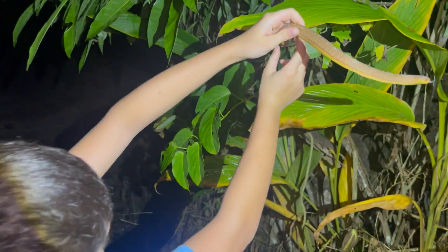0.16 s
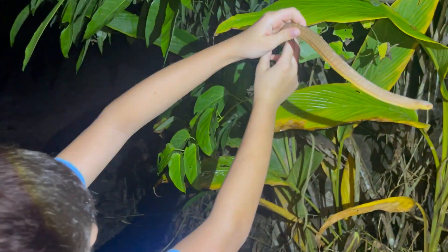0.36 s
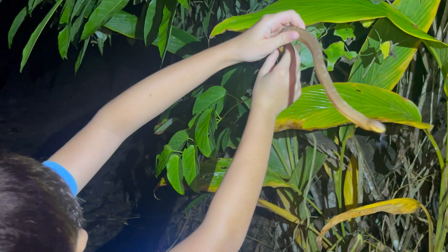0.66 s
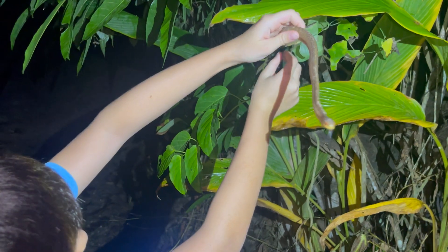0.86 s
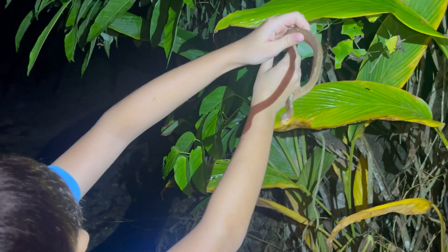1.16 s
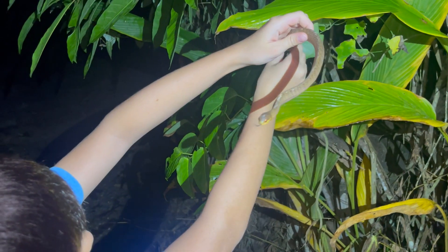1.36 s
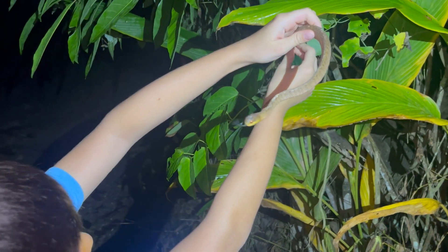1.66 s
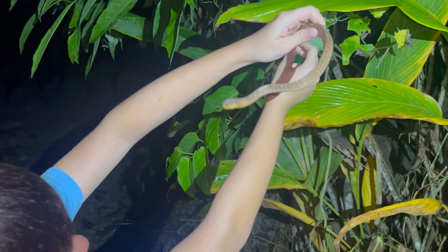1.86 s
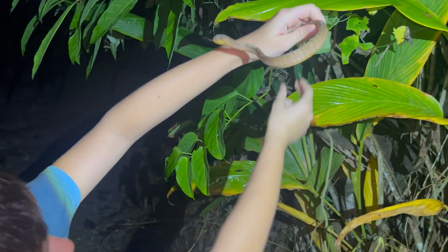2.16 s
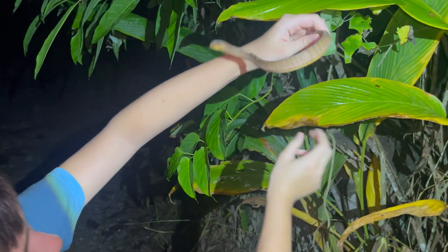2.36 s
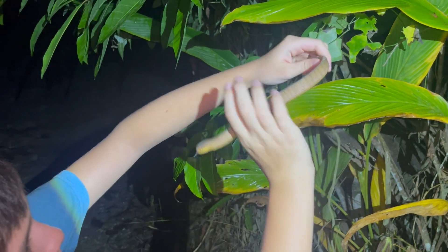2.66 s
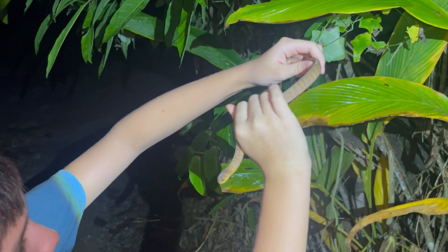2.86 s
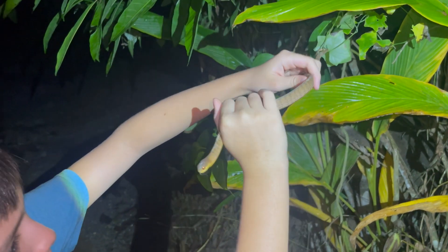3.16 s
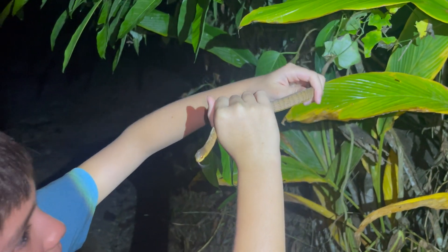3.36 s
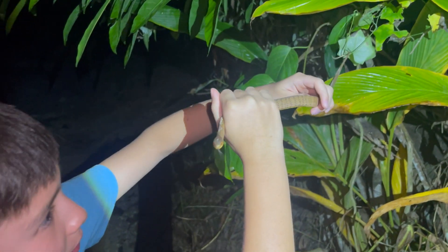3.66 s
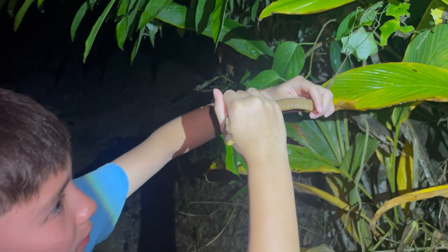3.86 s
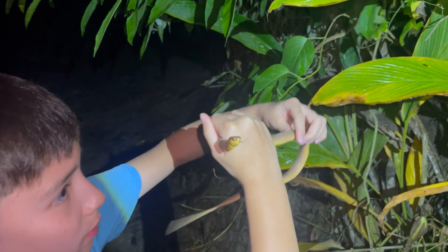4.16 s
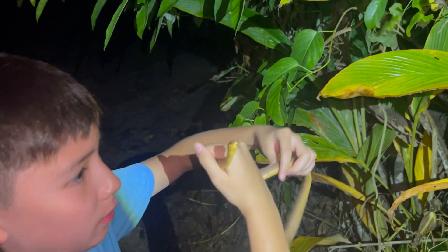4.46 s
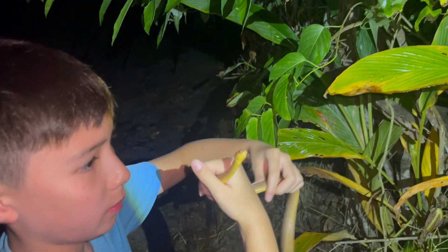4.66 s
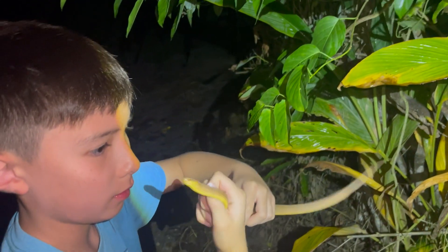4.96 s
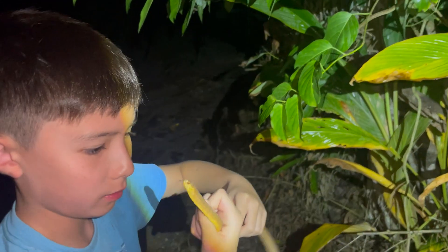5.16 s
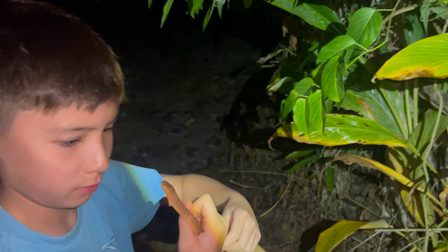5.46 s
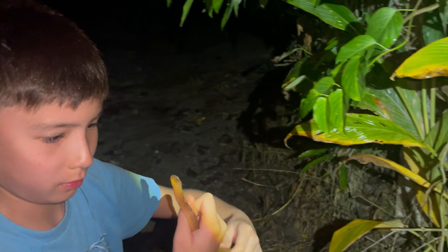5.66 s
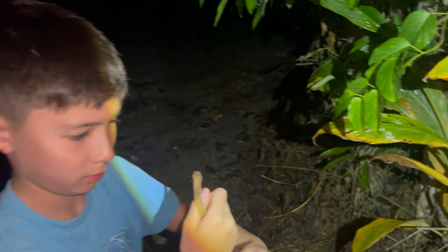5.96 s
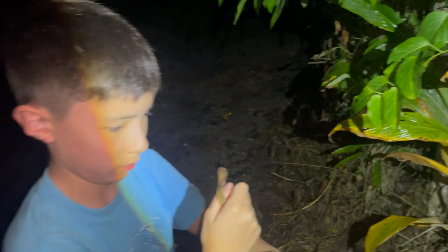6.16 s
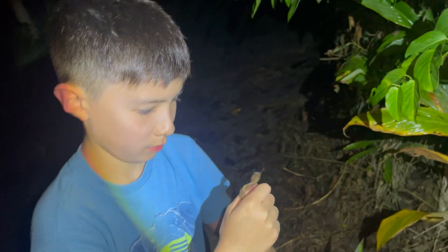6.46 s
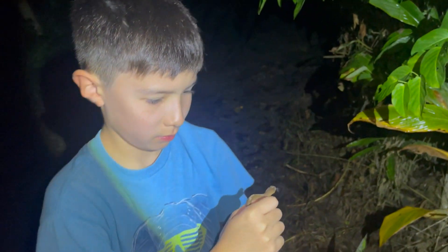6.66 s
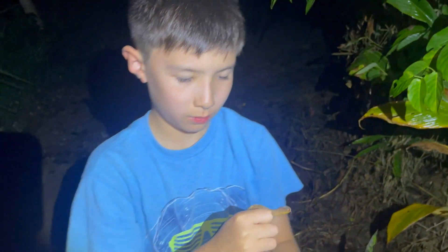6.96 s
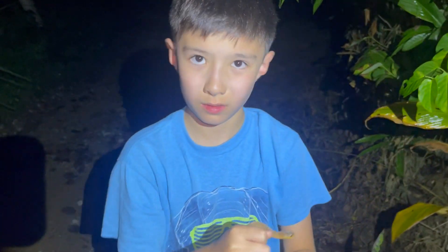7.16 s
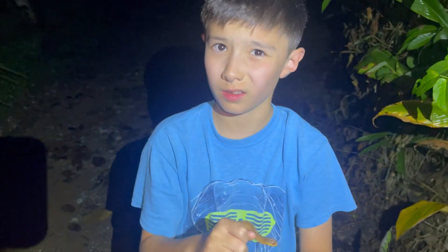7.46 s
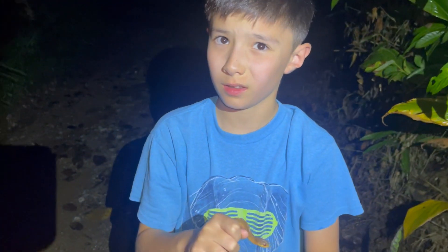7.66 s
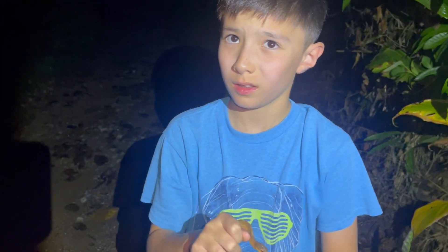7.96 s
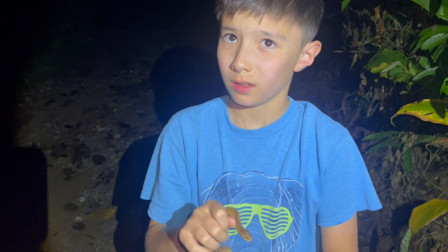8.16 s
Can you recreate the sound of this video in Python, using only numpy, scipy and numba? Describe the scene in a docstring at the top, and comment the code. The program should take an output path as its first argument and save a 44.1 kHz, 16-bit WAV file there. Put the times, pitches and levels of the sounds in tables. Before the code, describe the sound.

Crickets trill without a break for the whole eight seconds or so, a high, fast-pulsing chorus on all sides of a rainforest at night. Three other crickets chirp through the leaves, slightly lower, in short rising strokes, each about twice a second. Far insects and frogs blur into a faint throb over a light hiss. The sound drifts gently between left and right as the hand-held phone turns. From about 1 to 5 seconds there are only very soft cloth movements and dull handling thuds, with a few tiny stem ticks around 2 seconds. From 5.5 seconds, leaves and cloth rub close to the microphone in short bursts, mixed with small dry snaps. Near 6.9 seconds comes a quick cluster of hollow knocks with one sharp hit, the loudest moment. Light rustles, clicks and faint thuds continue, with a crisp snap at 8.2 seconds.

```python
"""Crickets in a wet forest at night

Taken among the trees on a hand-held phone, its two microphones slowly turning. Crickets trill on all
sides with steady wing strokes, and three others chirp in rising strokes through the leaves. Far insects
and frogs blur into bands over a faint hiss. Close to the phone, leaves and cloth rub, stems snap, feet
and grip thud and something hollow is knocked, mostly in the last three seconds."""
import sys
import numpy as np
from scipy import signal
from scipy.fft import rfft, irfft
from scipy.io import wavfile
from scipy.ndimage import uniform_filter1d
from numba import njit

SR = 44100
rng = np.random.default_rng(int(sys.argv[2]) if len(sys.argv) > 2 else 0)


def file_out(sig):
    """Save sig as 16-bit WAV at sys.argv[1]."""
    # one column per channel
    cols = np.atleast_2d(sig).T
    # limit, then scale
    lim = np.clip(cols, -1, 1)
    pcm = np.round(lim * 32767).astype(np.int16)
    wavfile.write(sys.argv[1], SR, pcm)


N = 366030
T = np.arange(N) / SR

# trilling crickets all round, the two nearest first (their pitch comes from NEAR_WANDER):
# stroke rate/Hz, wing f/Hz, relative level/dB, stroke length/s, pitch fall/Hz, alternate stroke cut/dB
TRILLING_CRICKETS = [ (61.17, 5500, 0, .016, 120, 1.5), (60.19, 5600, -1.5, .0165, 60, 0),
                     (60.19, 5700, -4, .008, 300, 1), (61.04, 5400, -1, .014, 480, -3),
                     (62.15, 5540, -3.5, .014, 410, -5), (58.76, 5300, -3.5, .014, 1070, -3.5),
                     (63.8, 5680, -8, .011, 610, 6), (60.4, 5070, -12, .008, 240, 5),
                     (63.6, 5910, -8.5, .010, 730, 4)]
# unsteadiness of each one's stroke rate: spread/share of the rate
RATE_SPREAD = [.001, .00015, .00015, .002, .003, .004, .004, .002, .004]
# the two nearest wander: t/s, f of the first/Hz, f of the second/Hz, gain of the second/dB
NEAR_WANDER = [(0, 5450, 5680, -8), (.5, 5480, 5650, -9), (.9, 5534, 5630, -8), (1, 5540, 5620, -2.5),
               (2, 5534, 5580, -1.5), (3.05, 5535, 5583, -1), (3.2, 5550, 5598, -12),
               (3.5, 5460, 5640, -11), (3.6, 5446, 5460, -12), (4.8, 5430, 5550, -14), (5, 5440, 5670, -18),
               (5.6, 5436, 5598, -8), (6.1, 5373, 5560, -20), (6.5, 5525, 5560, -16), (7, 5570, 5598, -15),
               (7.5, 5466, 5610, -8), (8.3, 5586, 5526, 3)]
# the whole trill at the turning phone: t/s, level/dB, left minus right/dB
TRILL_AT_PHONE = [(0, -39.5, 0), (.3, -37.5, 0), (1, -39.5, -2), (1.7, -39, -1.5), (2.4, -40, -0.5),
                  (3, -39, -1), (3.7, -40.5, 1.5), (4.4, -39, 0.5), (5.2, -39.5, -1.5), (5.6, -38, 0.5),
                  (6, -38.5, -0.5), (6.4, -40, 0), (7, -39, -1.5), (7.4, -40.5, 1), (8.3, -39.5, 0)]
NEAR_DIRECT_DB, TRILL_SIDE_DB = [-6.5, -1.5], -0.5  # direct sound of the nearest two; side against mid
FLUTTER_HZ, FLUTTER_DB = 36, 1.5  # quick chance swells of the trill

# chirping crickets by name: stroke spacing/s, full f/Hz, first stroke flat by/Hz,
# flatness left at each next stroke/share, full climb/Hz, first stroke cut/dB, left minus right/dB
CHIRPING_CRICKETS = {"low": (.061, 4660, 240, .4, 470, 1.5, 1.5),
                     "middle": (.062, 4660, 60, .45, 170, 1.5, -1.5),
                     "high": (.066, 4915, 130, .3, 200, 3, -2.5)}
# their chirps: t/s, singer, length/s, level/dB, growth per stroke/dB
CHIRP_TIMES = [(-0.106, "high", .2, -43, 0), (-0.124, "middle", .19, -47.5, 0.5),
               (0.282, "low", .19, -44.5, 2), (0.35, "high", .2, -41, -3), (0.442, "middle", .12, -52, 5.5),
               (0.778, "low", .19, -47.5, 2.5), (0.891, "high", .2, -46.5, 0.5),
               (0.963, "middle", .19, -48.5, 1.5), (1.308, "low", .19, -47, 2.5),
               (1.428, "high", .2, -45, 0.5), (1.602, "middle", .12, -49, -1),
               (1.861, "low", .25, -44.5, 1), (1.884, "high", .2, -48, 4), (2.325, "high", .26, -46, 1),
               (2.417, "low", .19, -43, 0), (2.812, "middle", .12, -51, -2), (2.931, "low", .19, -46, 2.5),
               (2.932, "middle", .12, -49, 7), (3.308, "high", .26, -47, 3.5),
               (3.404, "low", .19, -42, -0.5), (3.644, "middle", .06, -48, 0),
               (3.763, "high", .2, -42.5, 0), (3.795, "middle", .12, -50, 3), (3.889, "low", .19, -47, 4.5),
               (4.256, "middle", .06, -47, 0), (4.326, "high", .2, -42, -0.5),
               (4.369, "low", .19, -44.5, 3.5), (4.815, "low", .19, -44, 1.5),
               (4.857, "high", .26, -43.5, 0.5), (5.368, "low", .19, -43, 2.5),
               (5.393, "high", .26, -44.5, 1), (5.859, "low", .19, -42, 3), (5.933, "high", .2, -40.5, 0.5),
               (6.066, "middle", .12, -52, 6), (6.373, "low", .25, -40, 1.5),
               (6.531, "high", .2, -39.5, -3), (6.622, "middle", .19, -43.5, -0.5),
               (7.04, "low", .19, -41, 0), (7.088, "high", .26, -45, 1.5), (7.266, "middle", .06, -44, 0),
               (7.596, "low", .19, -40, -1), (7.599, "high", .2, -48, 3.5),
               (7.779, "middle", .12, -45.5, 1), (8.158, "low", .19, -41.5, -0.5),
               (8.206, "high", .13, -56, 0)]
# how squarely the phone faces the low singer: t/s, direct sound/dB
LOW_SINGER_FACING = [(0, -3), (.7, -6), (1.4, -5), (2, -7), (4.3, -7), (5, -4), (5.6, -1), (8.3, -1)]
HIDDEN_DB = -6  # direct sound of the middle and high singers, always behind leaves
STROKE_SCATTER_DB, STROKE_JITTER_S, STROKE_JITTER_HZ = 1.6, .002, 15

# dry leaves and stems snapping close by: t/s, level/dB, f/Hz, t60/s, left minus right/dB
STEM_SNAPS = [(1.279, -55, 3220, 0.025, 2.5), (1.708, -46.5, 1100, 0.013, 6), (1.802, -51, 950, 0.018, 8),
              (2.017, -48.5, 1090, 0.028, 7), (2.06, -48, 900, 0.02, 5), (2.297, -40, 2940, 0.031, 6),
              (2.365, -50, 325, 0.034, 12), (3.099, -57, 2750, 0.02, 0.5), (5.579, -32, 1130, 0.022, 0),
              (5.71, -42, 800, 0.027, 2), (5.731, -39, 1300, .025, 2), (5.762, -36, 1200, .025, 4),
              (5.816, -38, 2300, 0.017, 2), (5.827, -40, 2120, 0.03, 4), (5.834, -45, 2200, 0.018, 0),
              (5.85, -40, 1000, 0.034, 2), (5.864, -33.5, 2650, 0.019, 4), (6.263, -41, 2570, 0.021, 0),
              (6.29, -42, 2570, 0.027, 2), (6.359, -39, 920, 0.064, 2), (6.565, -39, 1320, 0.054, 3),
              (6.608, -40.5, 310, 0.029, 4), (6.713, -58, 340, 0.015, 4), (6.729, -46, 1930, 0.025, -5),
              (6.76, -38, 730, 0.044, 2), (6.948, -44, 3000, 0.033, 4), (7.01, -41, 2420, 0.021, -3),
              (7.017, -36.5, 3470, 0.02, 5), (7.042, -46, 2690, 0.023, 1.5), (7.135, -42.5, 780, 0.047, 4),
              (7.179, -55, 2790, 0.025, 1.5), (7.246, -41, 2800, 0.074, 2.5), (7.289, -39, 1630, 0.033, 5),
              (7.344, -49, 2200, .02, 2), (7.457, -43, 2000, .03, 4), (7.499, -49, 2600, 0.018, 2),
              (7.479, -38, 322, 0.018, 3), (7.535, -34.5, 2710, 0.014, 0), (7.554, -39, 1740, 0.023, 2),
              (7.795, -42.5, 2960, 0.029, 7), (7.898, -43.5, 1170, 0.032, 1), (8.23, -28, 2480, 0.019, 4.5)]
# knocks on a hollow stem or case: t/s, level/dB, crack against body/dB, left minus right/dB
HOLLOW_KNOCKS = [(6.745, -42, -1, 5), (6.765, -33.5, -8, 6), (6.811, -24.5, -14, 5),
                 (6.832, -34.5, -19, -7), (6.838, -37, -22, -2), (6.865, -13.5, -5.5, 6.5),
                 (6.873, -29.5, -0.5, -10), (6.899, -40, 1, 5)]
# modes of the hollow body: f/Hz, relative level/dB, t60/s
BODY_MODES = [(660, -1, 0.014), (746, -1.5, 0.013), (420, -8, 0.015), (310, -13.5, 0.012),
              (153, -39, 0.011), (1850, -12.5, 0.012)]
# modes of the sharp crack above it: f/Hz, relative level/dB, t60/s
CRACK_MODES = [(3060, -0.5, 0.0061), (4070, 6, 0.0079), (5400, 11.5, 0.0061), (6520, 8, 0.0069),
               (6950, 6.5, 0.007), (8500, -6, 0.0059)]
LATE_CYCLES, LATE_BELOW_HZ = 1.43, 920  # the lows of a blow travel slower through stem and hand

# leaves and cloth rubbing by the microphones: t/s, length/s, level/dB, relative bass/dB, bright f/Hz
CLOSE_RUBS = [(5.58, 0.036, -53, -11.5, 1180), (5.69, 0.06, -49.5, -17, 1100),
              (5.755, 0.046, -44.5, -19, 1700), (5.815, 0.025, -40, -37, 2100),
              (5.848, 0.014, -46, -16, 1480), (5.9, 0.069, -61.5, -1.5, 1490), (6.08, 0.15, -56, -11, 1950),
              (6.26, 0.12, -48.5, -14, 2600), (6.375, 0.065, -44.5, -19, 2390),
              (6.47, .14, -55.5, -11.5, 2270), (6.733, 0.036, -50, -2.5, 1120),
              (6.885, 0.0026, -42.5, -20, 2000), (6.92, 0.075, -54, -12, 2210),
              (7.015, 0.047, -52, -17, 1810), (7.135, 0.089, -56.5, -7, 2200),
              (7.245, 0.123, -51, -10, 1950), (7.38, 0.041, -55, 2, 1900), (7.445, 0.1, -49.5, -9, 1910),
              (7.6, 0.25, -60, -21, 2310), (7.86, 0.11, -56, -6, 1230), (7.96, 0.22, -58.5, -13, 1650),
              (8.235, .07, -56, -2, 2080)]
# hands and cloth shifting further off: t/s, level/dB
CLOTH_STIR = [(0, -99), (.6, -75), (1.1, -67.5), (1.35, -67), (1.8, -86), (1.95, -62.5), (2.55, -65.5),
              (3.8, -63.5), (4.45, -69.5), (4.75, -76), (4.95, -62.5), (5.4, -69.5), (5.55, -88)]
# dull thuds of feet and grip: t/s, length/s, level/dB
HANDLING_THUDS = [(.16, 0.036, -68), (.77, 0.089, -65.5), (1.22, 0.067, -67), (2.32, 0.071, -66),
                  (3.43, .1, -70), (3.91, .03, -74), (4.05, .03, -73), (5.03, 0.017, -58.5),
                  (5.51, .03, -72), (5.62, 0.033, -67), (6.18, .06, -71), (6.43, 0.037, -70),
                  (6.6, 0.032, -71), (6.73, 0.2, -60.5), (7.32, 0.071, -62), (7.9, .05, -62),
                  (8.22, 0.032, -63)]
RUMBLE_DB, RUMBLE_DRIFT_DB = -75.5, 4

# insects and frogs deep in the forest: f/Hz, width/Hz, level/dB
FAR_CHORUSES = [(2764, 145, -64), (2710, 650, -67.5), (3255, 390, -67.5), (1130, 380, -70),
                (4937, 120, -59.5)]
THROB_HZ, THROB_DB = 12, 2.1
# spectrum of the faint hiss, cut off steeply above 9.4 kHz: f/Hz, relative level/dB
HISS_SPECTRUM = [(25, -16), (45, 1.5), (90, -10), (300, -7.5), (800, -9), (2100, -11), (3800, -15.5),
                 (4600, 0), (6300, 2), (7200, -6.5), (8800, -13.5), (9400, -20), (10000, -90)]
# how alike the hiss is at the two microphones: f/Hz, correlation
HISS_LIKENESS = [(60, 0.23), (260, 0.88), (600, 0), (2500, 0.0067), (6000, 0.15)]
HISS_DB = -55.5


def trilling_crickets():
    """On all sides: each wing stroke is a short falling tone; its paths shift as the phone moves."""
    chorus = np.zeros((2, N))
    *near_pitches, second_db = curves(NEAR_WANDER)
    for k, (rate, hz, db, length, fall_hz, weak_db) in enumerate(TRILLING_CRICKETS):
        near = k < len(near_pitches)
        if near:
            hz, db = near_pitches[k], db + k * second_db
        cycles = rng.random() + np.cumsum(rate * (1 + RATE_SPREAD[k] * walk(25))) / SR
        age = cycles % 1 / rate
        shape = np.sin(np.pi * np.clip(age / length, 0, 1)) ** 2 * undb(-weak_db * (cycles % 2 > 1))
        t = age - length / 2  # from the middle of the stroke
        phase = 2 * np.pi * (hz * t - fall_hz * t ** 2 / (2 * length))
        # the trill's octave is kept to a thin, narrow band near 11 kHz
        octave = undb(-32.5 - abs(hz - 5500) / 15) * np.sin(4 * np.pi * hz * t)
        song = undb(db) * shape * (np.sin(phase) + octave)
        turn = .9 * walk(3)
        chorus += np.cos(turn) * foliage(song, t60=.31) + np.sin(turn) * foliage(song, t60=.2)
        if near:
            chorus += song * undb(NEAR_DIRECT_DB[k])
    # so many singers that the sum holds steady, in the middle and at the sides
    mid_side = np.array([chorus[0] + chorus[1], chorus[0] - chorus[1]])
    mid, side = mid_side / np.sqrt(uniform_filter1d(mid_side ** 2, SR // 11, axis=1))
    side *= undb(TRILL_SIDE_DB)
    db, pan_db = curves(TRILL_AT_PHONE)
    return np.array([mid + side, mid - side]) * pan(undb(db + FLUTTER_DB * walk(FLUTTER_HZ)), pan_db)


def chirping_crickets():
    """Three among the leaves: each stroke is a near sine that climbs, then drops off at the end."""
    songs, direct = np.zeros((2, 2, N))
    t = T[:int(.054 * SR)]
    shape = np.clip(t / .008, 0, 1) * np.clip((t[-1] - t) / .008, 0, 1) * (.8 + t / .12)
    for start, top_hz, db, climb_hz, pan_db, is_low in list(chirp_strokes()):
        beat_phase, chance = rng.random(2)
        hz = top_hz - climb_hz * np.exp(-t / .017) - 220 * np.exp((t - t[-1]) / .005)
        phase = 2 * np.pi * np.cumsum(hz) / SR
        direct_db = np.interp(start, *np.transpose(LOW_SINGER_FACING)) if is_low else HIDDEN_DB
        # off axis, a close echo beats with the stroke and breaks it up
        depth = .15 - direct_db / 14
        waver = 1 + depth * np.sin(2 * np.pi * (beat_phase + (30 + 25 * chance) * t))
        octave = undb(-42 + 24 * depth) * is_low  # clearer from the side
        # the stroke reaches the two microphones with a chance lag
        tone = [np.sin(phase + lag) + octave * np.sin(2 * phase + lag) for lag in (0, 2 * chance)]
        stroke = pan(shape * waver * undb(db), pan_db) * tone
        add(songs, start, stroke)
        add(direct, start, stroke * undb(direct_db))
    return direct + foliage(songs, t60=.27, wet_db=-5)


def chirp_strokes():
    """The wing strokes of every chirp: it starts flat, its first stroke held back, then settles."""
    for start, singer, length, db, growth_db in CHIRP_TIMES:
        gap, full_hz, first_flat_hz, flat_share, climb_hz, first_cut_db, pan_db = CHIRPING_CRICKETS[singer]
        scatter = rng.standard_normal((8, 3)) * [STROKE_SCATTER_DB, STROKE_JITTER_S, STROKE_JITTER_HZ]
        for k in range(max(round(length / gap), 1)):
            off_db, off_s, off_hz = scatter[k]
            onset = start + k * gap + off_s
            flat_hz = first_flat_hz * flat_share ** k
            top_hz = full_hz - flat_hz + off_hz
            level_db = db + growth_db * k - first_cut_db * (k == 0) + off_db
            if onset > -.005:
                yield onset, top_hz, level_db, climb_hz - flat_hz, pan_db, singer == "low"


def snaps():
    """Dry leaves and stems break close by: a wide tick with a brief ring."""
    out, t = np.zeros((2, N)), T[:SR // 8]
    for start, db, hz, t60, pan_db in STEM_SNAPS:
        wide = signal.butter(2, [hz / 5, min(2.5 * hz, 3300)], "band", fs=SR)
        tick = unit(signal.lfilter(*wide, rng.standard_normal(len(t)))) * decay(t, t60)
        snap = .6 * tick + .25 * ring([(hz, 0, t60)], t)
        add(out, start, pan(undb(db) * snap, pan_db))
    return out


def knocks():
    """Blows at hand ring a hollow body under a sharp crack; contact builds up over a moment."""
    out, t = np.zeros((2, N)), T[:SR // 8]
    for start, db, crack_db, pan_db in HOLLOW_KNOCKS:
        body = undb(db) * (1 - np.exp(-t / .0006)) * ring(BODY_MODES, t)
        crack = undb(db + crack_db) * (1 - np.exp(-t / .0007)) * ring(CRACK_MODES, t)
        add(out, start, pan(body, pan_db) + crack)
    return out


def through_stem_and_hand(blows):
    """Blows reach the phone with their lows late, followed by a short scatter off the leaves."""
    ratio = np.clip(np.fft.rfftfreq(N, 1 / SR), 40, LATE_BELOW_HZ) / LATE_BELOW_HZ
    lag_cycles = LATE_CYCLES * (np.log(ratio) - ratio + 1)
    arrived = irfft(rfft(blows) * np.exp(-2j * np.pi * lag_cycles), N)
    arrived = lowpass(arrived, hz=10000, order=4)
    return arrived + foliage(arrived, t60=.07, wet_db=-9)


def rubs():
    """Leaf slips on leaf and cloth on skin by the microphones: a moving bright zone over dull bumps."""
    db, bass_db, bright_hz = swells(CLOSE_RUBS, rise_db_s=510, fall_db_s=452)
    slips = grit(600, 2.2, .004)
    bright_hz = bright_hz * (1 + .15 * walk(40))  # each slip rings another patch of leaf
    middle = band(slips, 900 * (1 + .25 * walk(30)), 950) * undb(2.7 * walk(30))
    body = unit(steep_band(slips, bright_hz, 1900) + middle)
    bumps = unit(band(grit(90, 1.8, .008), 220, 300)) * undb(bass_db)
    treble_db = -30 + 1.26 * np.maximum(db + 54.5, 0)  # harder rubs are brighter
    treble = unit(steep_band(slips, 5800, 3660)) * undb(treble_db)
    return (body + bumps + treble) * pan(undb(db), 2.5)


def stir():
    """Hands and cloth shift softly and unevenly, further from the microphones."""
    slips = unit(band(grit(90, .85, .0081), 350, 1280))
    return slips * undb(curves(CLOTH_STIR)[0] + 2 * walk(12))


def thuds():
    """Feet and grip thud dully over a drifting rumble."""
    bass = unit(steep_band(grit(24, 5.1, .021), 64, 65))
    thud_db = swells(HANDLING_THUDS, rise_db_s=300, fall_db_s=132)[0]
    rumble_db = RUMBLE_DB + RUMBLE_DRIFT_DB * walk(2.59)
    return bass * np.hypot(undb(thud_db), undb(rumble_db))


def far_choruses():
    """Distance melts insects and frogs into narrow throbbing bands."""
    out = np.zeros((2, N))
    for hz, width, db in FAR_CHORUSES:
        noise = rng.standard_normal((2, N)) + .72 * rng.standard_normal(N)
        centre = hz * (1 + .012 * walk(3))
        out += unit(steep_band(noise, centre, width)) * undb(db + THROB_DB * walk(THROB_HZ))
    return out


def faint_hiss():
    """A faint wide hiss, most alike at the two microphones in the bass."""
    log_f = np.log(np.fft.rfftfreq(N, 1 / SR) + 1)
    colour_db, alike = [np.interp(log_f, np.log(hz), values)
                        for hz, values in map(np.transpose, (HISS_SPECTRUM, HISS_LIKENESS))]
    mid, side = rfft(rng.standard_normal((2, N))) * undb(colour_db) * np.sqrt([1 + alike, 1 - alike])
    return unit(irfft([mid + side, mid - side], N)) * undb(HISS_DB)


def foliage(x, t60, wet_db=0):
    """Trunks and leaves scatter the sound into a tail of echoes, one for each microphone."""
    t = T[:SR // 4]
    echoes = rng.standard_normal((2, len(t))) * decay(t, t60)
    echoes *= undb(wet_db) / np.sqrt(np.sum(echoes ** 2, axis=1, keepdims=True))
    return signal.fftconvolve(np.atleast_2d(x), echoes, axes=1)[:, :N]


def grit(rate, scatter_db, tail_s):
    """Noise roughened by dense clicks of uneven size, each with a short tail."""
    clicks = (rng.random(N) < rate / SR) * undb(scatter_db * rng.exponential(size=N))
    puffs = signal.lfilter([1], [1, -np.exp(-1 / (tail_s * SR))], clicks)
    return (puffs + 1.1) * (rng.standard_normal(N) + .64 * rng.standard_normal((2, N)))


def ring(modes, t):
    """Decaying modes after one blow."""
    return sum(undb(db) * np.sin(2 * np.pi * hz * t) * decay(t, t60) for hz, db, t60 in modes)


def decay(t, t60):
    """A fall of 60 dB in t60 seconds."""
    return np.exp(-np.log(1000) * t / t60)


def swells(rows, rise_db_s, fall_db_s):
    """Each row rises, holds and falls: level and further columns of the loudest at every sample."""
    start, length, db, *columns = np.transpose(rows)[:, :, None]
    t = T[::64]
    db = db - rise_db_s * np.maximum(start - t, 0) - fall_db_s * np.maximum(t - start - length, 0)
    loudest = np.argmax(db, axis=0)
    columns = [uniform_filter1d(c[loudest, 0], size=14) for c in columns]
    return [np.interp(T, t, c) for c in [db.max(axis=0), *columns]]


def curves(table):
    """The columns after t/s, at every sample."""
    times, *columns = np.transpose(table)
    return [np.interp(T, times, c) for c in columns]


def walk(rate):
    """Random levels held 1 / rate s and smoothed twice; spread near 1."""
    hold = int(SR / rate)
    steps = np.repeat(rng.standard_normal(N // hold + 1), hold)
    return 1.2 * uniform_filter1d(uniform_filter1d(steps, hold), hold)[:N]


@njit
def svf(x, hz, width):
    """State-variable band-pass with a moving centre, gain 1 there."""
    y, band_state, low_state = np.empty(len(x)), 0., 0.
    for i in range(len(x)):
        g, damping = np.tan(np.pi * hz[i] / SR), width / hz[i]
        v = (band_state + g * (x[i] - low_state)) / (1 + g * (g + damping))
        band_state, low_state = 2 * v - band_state, low_state + 2 * g * v
        y[i] = damping * v
    return y


def band(x, hz, width):
    """Band-pass for every channel."""
    return np.array([svf(c, hz + np.zeros(N), float(width)) for c in np.atleast_2d(x)])


def steep_band(x, hz, width):
    """The band-pass twice over."""
    return band(band(x, hz, width), hz, width)


def lowpass(x, hz, order):
    """Roll off above hz."""
    return signal.sosfilt(signal.butter(order, hz, fs=SR, output="sos"), x)


def undb(db):
    """Decibels to gain."""
    return 10 ** (np.asarray(db) / 20)


def unit(x):
    """Scale to rms 1."""
    return x / np.sqrt(np.mean(x ** 2))


def pan(x, db):
    """Two channels, left above right by db."""
    return np.array([x * undb(db / 2), x * undb(-db / 2)])


def add(out, start, sound):
    """Mix a short two-channel sound in at start seconds."""
    i = max(int(start * SR), 0)
    out[:, i:i + sound.shape[1]] += sound[:, :N - i]


def scene():
    """The forest as it reaches the two microphones."""
    crickets = trilling_crickets() + chirping_crickets()
    background = far_choruses() + faint_hiss()
    rustle = lowpass(rubs() + stir() + thuds(), hz=9000, order=6)
    return crickets + through_stem_and_hand(snaps() + knocks()) + rustle + background


def record(dry):
    """The phone cuts the bass below 40 Hz and the top above 11.3 kHz."""
    x = signal.sosfilt(signal.butter(3, 40, "high", fs=SR, output="sos"), dry)
    return signal.sosfilt(signal.ellip(10, .2, 60, 11300, fs=SR, output="sos"), x)


dry = scene()
out = record(dry)
file_out(out)
```